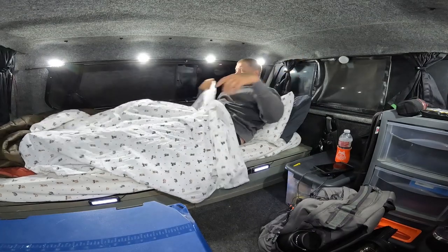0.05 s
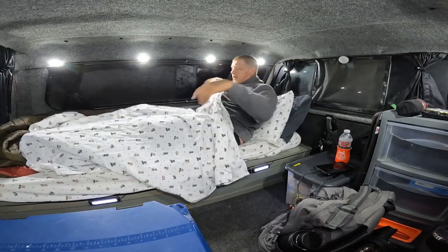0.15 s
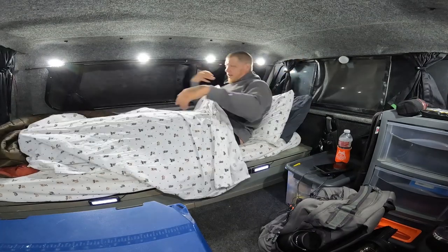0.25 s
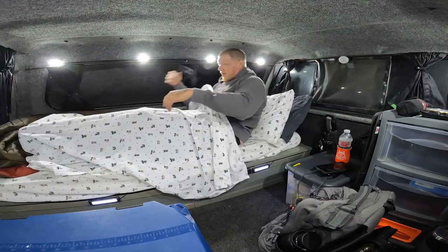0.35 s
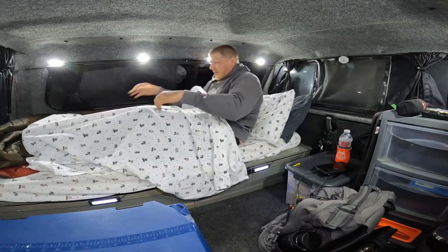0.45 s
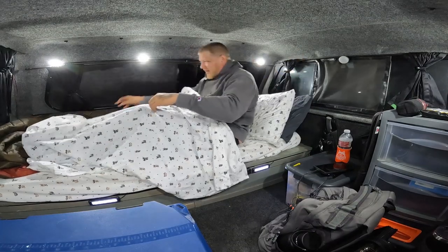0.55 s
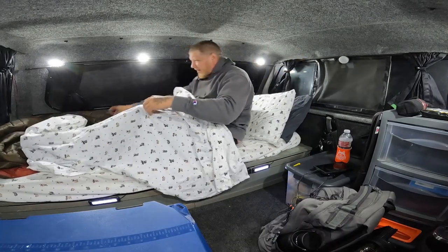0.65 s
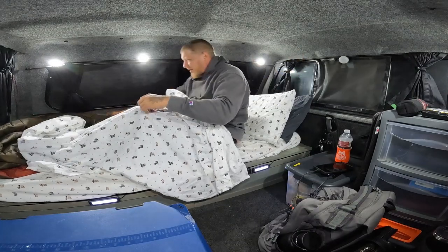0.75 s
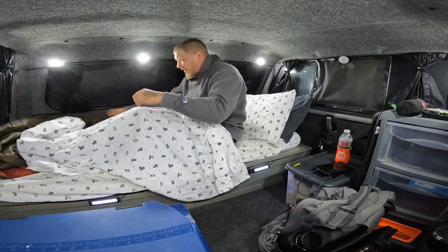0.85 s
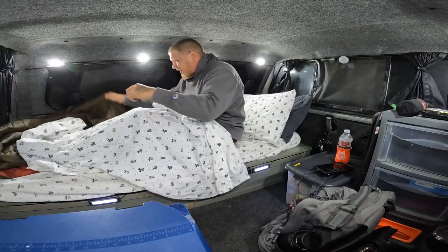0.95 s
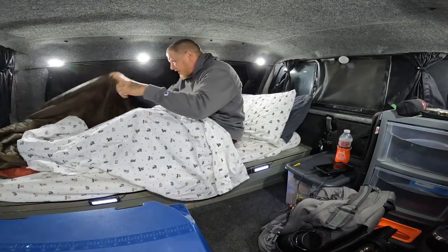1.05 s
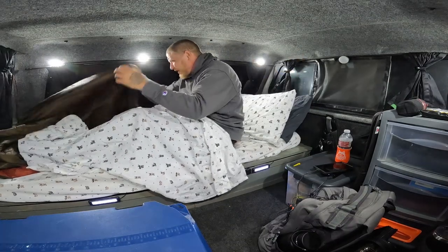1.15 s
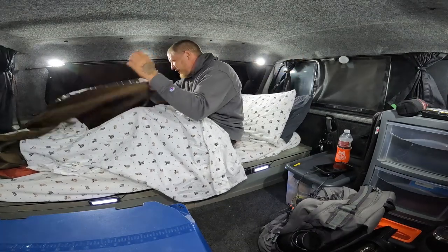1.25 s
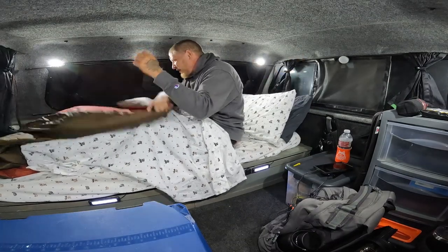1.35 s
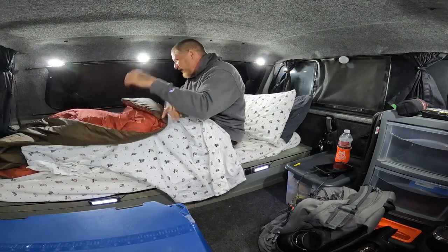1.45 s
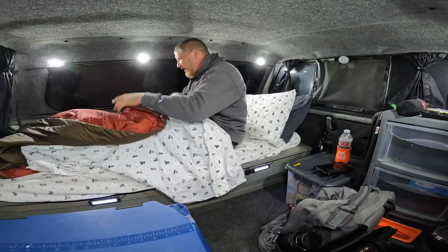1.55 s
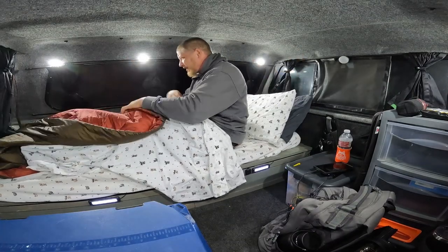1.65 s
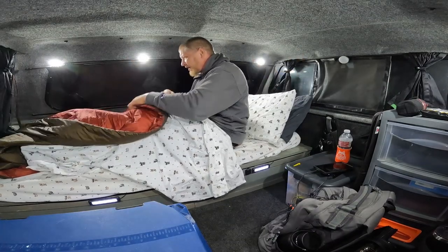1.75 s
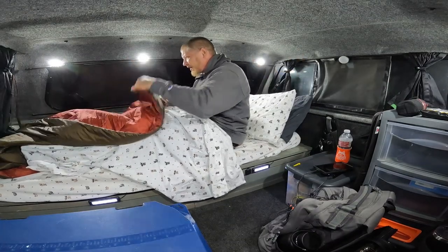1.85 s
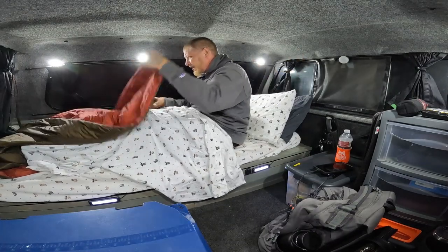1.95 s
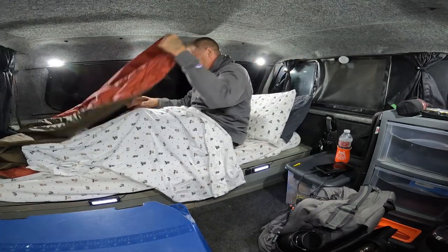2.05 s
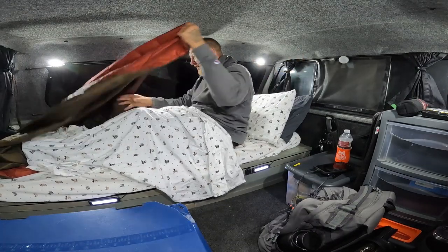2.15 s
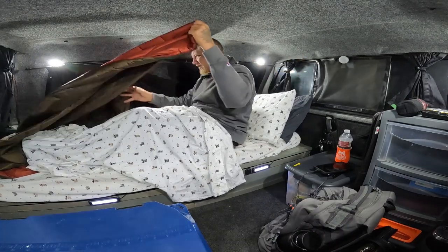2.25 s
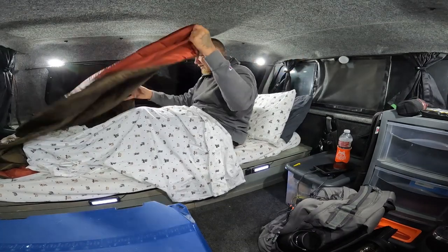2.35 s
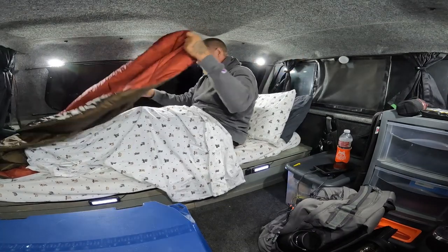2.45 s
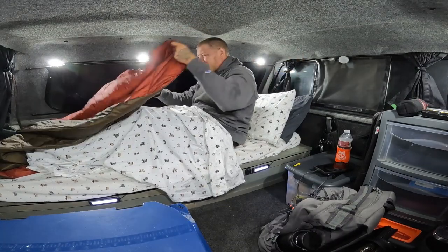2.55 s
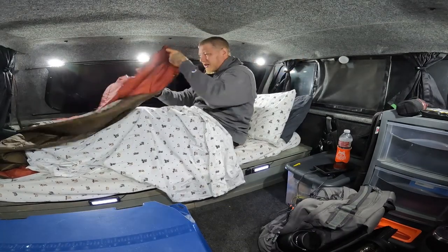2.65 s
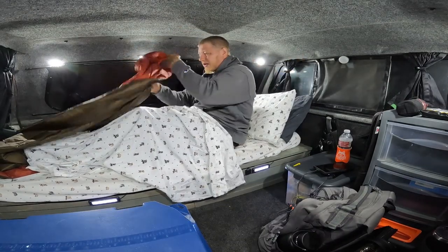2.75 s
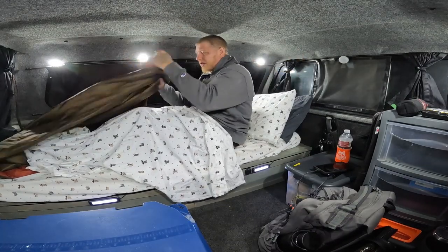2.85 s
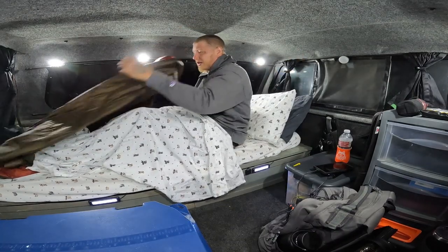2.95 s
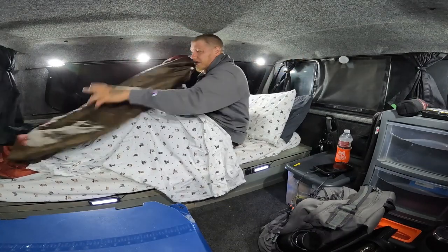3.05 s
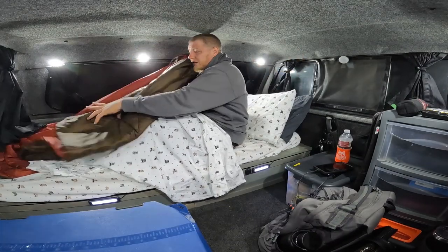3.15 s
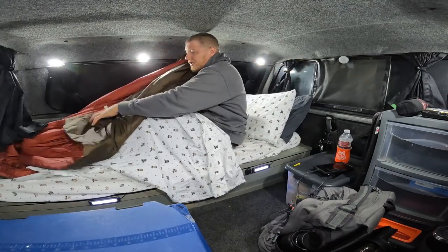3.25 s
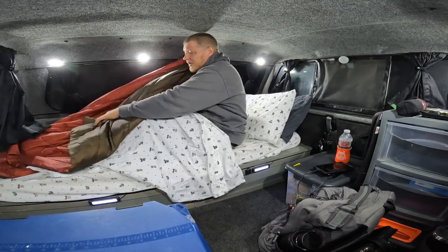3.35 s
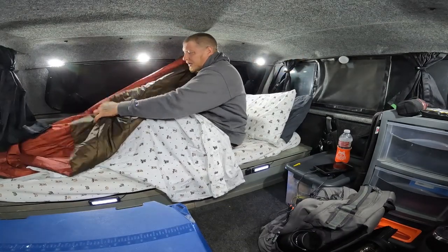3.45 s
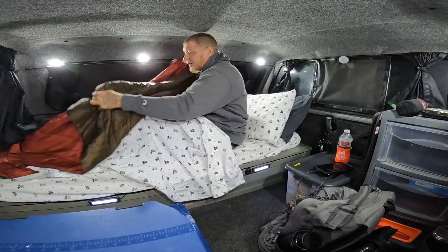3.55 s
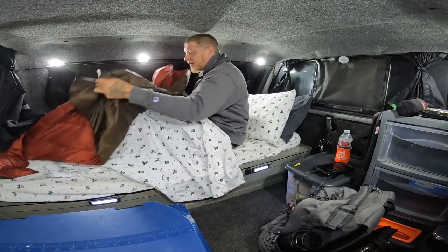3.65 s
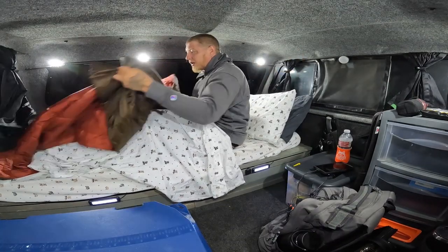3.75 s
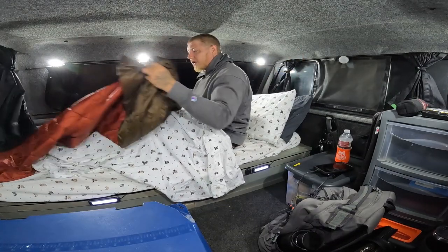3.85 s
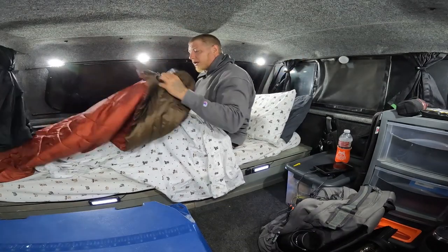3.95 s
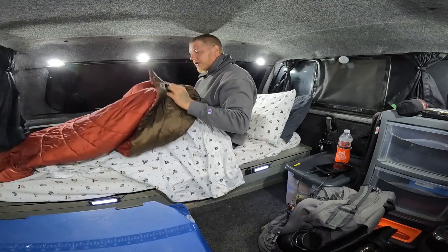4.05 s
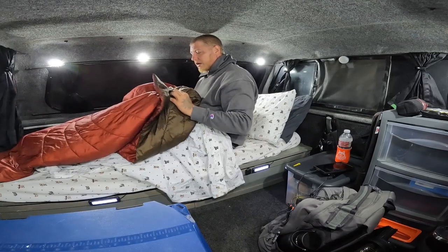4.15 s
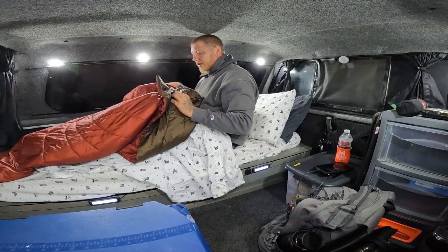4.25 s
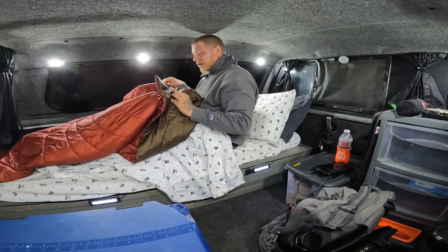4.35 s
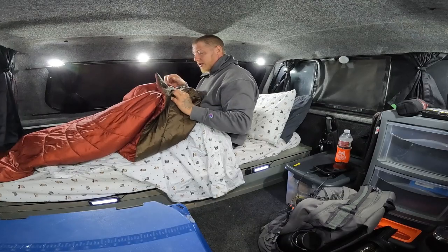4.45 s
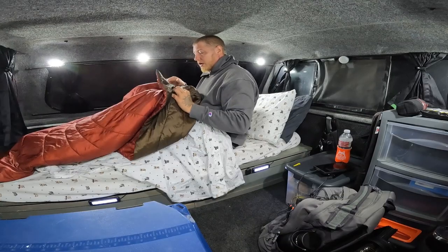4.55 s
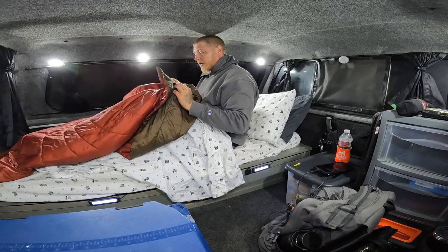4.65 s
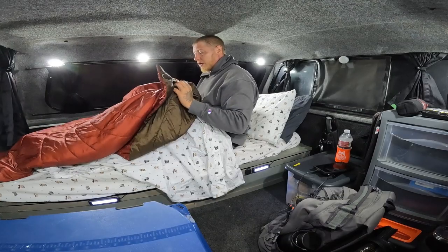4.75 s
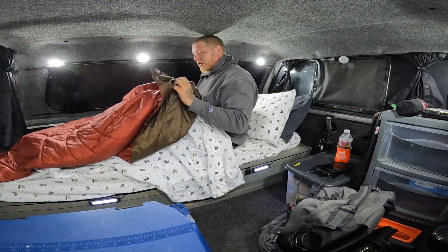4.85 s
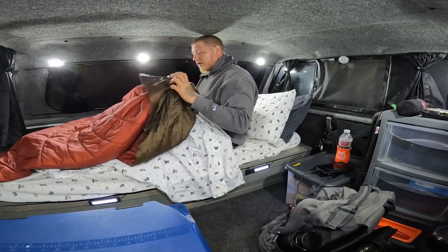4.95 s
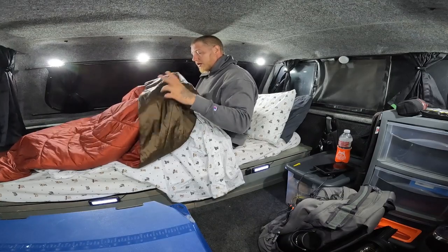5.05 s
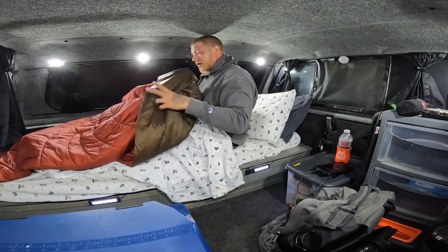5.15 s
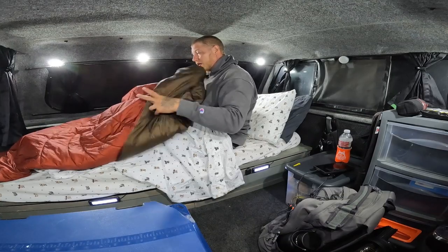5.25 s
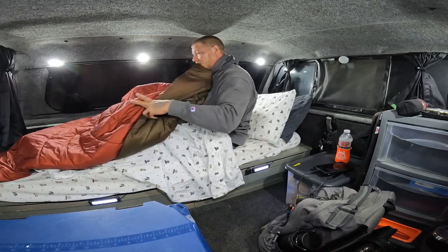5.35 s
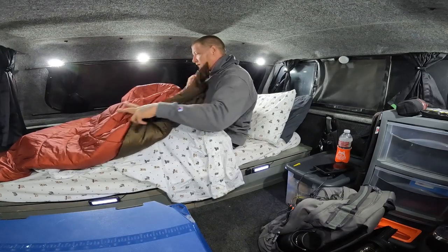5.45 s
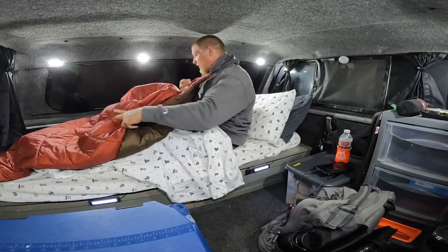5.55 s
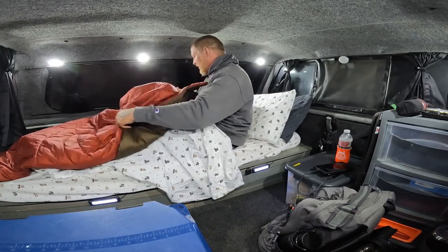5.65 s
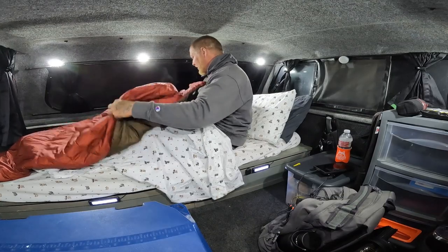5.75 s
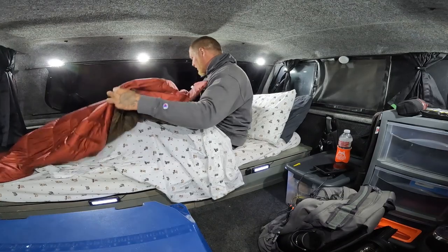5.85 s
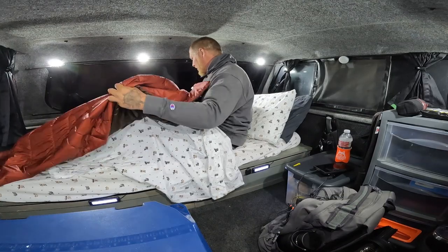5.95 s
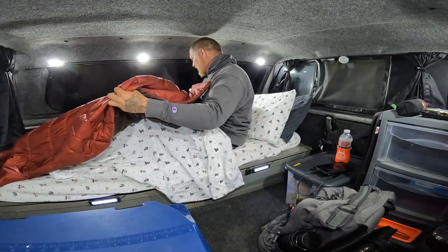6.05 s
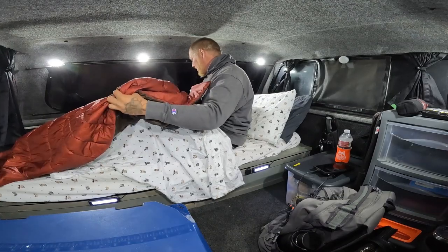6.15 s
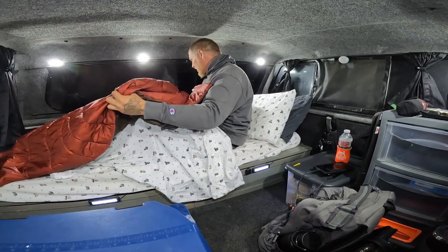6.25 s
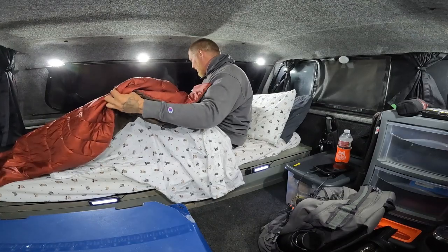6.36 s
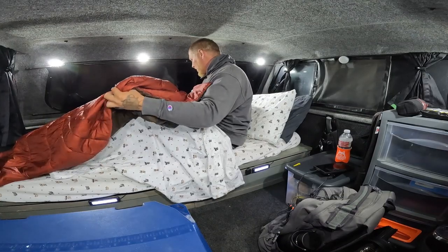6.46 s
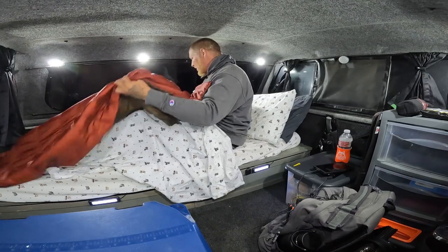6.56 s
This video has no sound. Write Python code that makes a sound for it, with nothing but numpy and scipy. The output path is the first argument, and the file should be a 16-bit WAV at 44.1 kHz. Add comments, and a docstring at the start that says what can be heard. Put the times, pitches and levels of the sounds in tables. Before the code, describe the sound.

Close, dry stereo pickup in a small padded camper. Covers flop softly and a few bed knocks thud, then a nylon sleeping bag is hauled up in quick swishes with snapping folds. The firmest woody knock comes early; broader, brighter shakes follow, then gentler sliding, a tiny hollow pop and more rustling.

```python
"""A small padded camper: someone sitting on a mattress pulls up a nylon sleeping bag and shakes it out.
The shell's swish and crinkle are coloured noise under bell-shaped sweeps, roughened by random creases.
Thick folds flop, bump and snap in short noise bursts; threads squeak and a puff of air pops as sines.
Each waft sets the cabin air swaying in deep noise, and bodies and knocks ring the bed's decaying tones."""
import sys
import numpy as np
from scipy import signal
from scipy.fft import rfft, irfft
from scipy.io import wavfile
from scipy.ndimage import uniform_filter1d

SR = 44100
rng = np.random.default_rng(int(sys.argv[2]) if len(sys.argv) > 2 else 0)


def master(y):
    """Save y as 16-bit WAV."""
    cut = np.clip(np.atleast_2d(y).T, -1, 1)
    pcm = np.round(cut * 32767)  # scale
    wavfile.write(sys.argv[1], SR, pcm.astype(np.int16))


N = 291060
TIME = np.arange(N) / SR   # seconds
FREQ = np.maximum(np.fft.rfftfreq(N, 1 / SR), 1)   # Hz, kept above zero so its logarithm exists


def from_db(db):
    """Turn decibels into a gain."""
    return 10 ** (np.asarray(db) / 20)


def rms_one(x):
    """Scale a signal to unit power."""
    return x / np.sqrt(np.mean(x ** 2) + 1e-20)


def over_freq(points):
    """Read a table at every frequency, with straight lines over log frequency."""
    hz, value = np.transpose(points)
    return np.interp(np.log(FREQ), np.log(hz), value)


def colour(points):
    """Gain of a noise spectrum, falling steeply beyond both ends of its table."""
    low_edge = np.minimum(FREQ / points[0][0], 1) ** 3
    high_edge = np.minimum(points[-1][0] / FREQ, 1) ** 3
    return from_db(over_freq(points)) * low_edge * high_edge


def drift(rate_hz):
    """Slow random wandering with a spread of 1."""
    spectrum = rfft(rng.standard_normal(N))
    return rms_one(irfft(spectrum / (1 + (FREQ / rate_hz) ** 2), N))


def hiss():
    """Two unrelated white noises."""
    return rng.standard_normal((2, N))


# how alike left and right are: pitch_hz, likeness (0 to 1)
EAR_LIKENESS = [(60, 0.99), (150, 0.99), (300, 0.95), (600, 0.72), (1200, 0.79), (2200, 0.63), (4000, 0.7),
                (8000, 0.78), (12000, 0.15)]
# how much louder left is than right: pitch_hz, left_minus_right_db
EAR_LEAN = [(60, 0), (200, 0.8), (380, 0.6), (700, 2.5), (1290, 1.5), (2380, 3.5), (4400, 1.5), (8120, 3.5),
            (15000, 8)]


def heard(pair, gain):
    """Colour two noises and mix them to left and right, most alike in the bass; their average has rms 1."""
    alike = np.clip(over_freq(EAR_LIKENESS), 0, .999)
    mid, side = rfft(pair) * gain
    sign = np.array([[1], [-1]])   # left, right
    mixed = np.sqrt(1 + alike) * mid + sign * np.sqrt(1 - alike) * side
    out = irfft(mixed * from_db(sign * over_freq(EAR_LEAN) / 2), N)
    return out / np.std(out.mean(axis=0))


def bursts(times, levels_db, rise_s, t60):
    """Loudness curve of blows that swell quickly, then die away by 60 dB in t60 seconds."""
    out = np.zeros(N)
    age = TIME[:SR // 2]
    shape = (1 - np.exp(-age / rise_s)) * from_db(-60 * age / t60)
    for s, db in zip(times, levels_db):
        part = out[round(s * SR):][:len(age)]   # a view: adding to it adds to out
        part += from_db(db) * shape[:len(part)] / shape.max()
    return out


def ring(clicks, hz, t60):
    """A two-pole resonance: a unit click sets a dying sine of height 1 ringing."""
    radius = from_db(-60 / (t60 * SR))
    angle = 2 * np.pi * hz / SR
    tiny = 1e-18   # keeps the filter away from extremely small numbers
    return signal.lfilter([0, np.sin(angle)], [1, -2 * radius * np.cos(angle), radius ** 2], clicks + tiny)


def struck(times, levels_db, modes):
    """Blows ring a set of tones; levels_db has a row per tone, varied by about a decibel each blow."""
    at = np.round(times * SR).astype(int)
    out = np.zeros(N)
    chance_db = rng.standard_normal((len(times), len(modes)))
    for k, (hz, db, t60) in enumerate(modes):
        clicks = np.zeros(N)
        clicks[at] = from_db(levels_db[k] + db + chance_db[:, k])
        out += (-1) ** (k // 2) * ring(clicks, hz, t60)   # the sign flips after every two tones
    return out


def softened(x, contact_s):
    """A padded contact spreads each blow in time."""
    soft = np.exp(-1 / (contact_s * SR))
    return signal.lfilter([1 - soft], [1, -soft], x)


def crinkle(per_s, spread_db, scatter_s, share):
    """Loudness curve of friction: steady sliding plus random buckling creases, smeared by near walls."""
    happens = rng.random(N) < per_s / SR
    sizes = from_db(spread_db * np.minimum(rng.exponential(1, N), 4)) * happens
    power = signal.lfilter([1], [1, -np.exp(-1 / (scatter_s * SR))], sizes ** 2 + 1e-18)
    share = np.clip(share, 0, 1)   # part of the power that comes from creases
    return np.sqrt(1 - share + share * power / power.mean())


MOVEMENT_DROP_DB = 9.5   # how much quieter one swell time before the peak and one fade time after it


def movement(s, swell_s, fade_s):
    """Cloth or air gathers speed and slows again in a bell that peaks at 1."""
    since = TIME - s
    away = np.minimum(np.abs(since) / np.where(since < 0, swell_s, fade_s), 4)
    return from_db(-MOVEMENT_DROP_DB * away ** 2)


# tone of the cabin at rest: pitch_hz, level_db (per Hz, relative)
QUIET_CABIN_TONE = [(12, -38), (20, 14.5), (129, -23), (185, -5), (361, -19), (477, -29), (533, -11.5),
                    (931, -56), (1370, -6), (2610, -56), (2830, -34), (3850, -32), (5370, -15.5),
                    (7300, -21), (15500, -53)]


def still_air():
    """The cabin at rest is a very quiet, steady coloured noise."""
    return from_db(-66.5) * heard(hiss(), colour(QUIET_CABIN_TONE))


# air pushed about as the bag billows and settles: peak_s, swell_and_fade_s, level_db
AIR_PUSHES = [(0.17, 0.44, -41.5), (0.9, 0.3, -42), (1.27, 0.099, -27.5), (1.52, 0.084, -39.5),
              (1.82, 0.075, -38.5), (2.22, 0.18, -37.5), (2.96, 0.4, -46.5), (3.4, 0.14, -40),
              (3.77, 0.094, -29.0), (3.93, 0.18, -38), (4.99, 0.38, -56), (5.41, 0.15, -46.5),
              (5.78, 0.12, -42), (6.08, 0.63, -54.0)]


def cabin_air(sway_hz, sharpness, flutter_db, flutter_growth, uneven_db):
    """The closed cabin answers each waft with a deep sway, alike at both ears, and with some flutter."""
    push_power = sum((from_db(db) * movement(s, length_s, length_s)) ** 2 for s, length_s, db in AIR_PUSHES)
    push = np.sqrt(push_power)
    response = 1 / (1 + 1j * sharpness * (FREQ / sway_hz - sway_hz / FREQ)) ** 2
    wave = signal.hilbert(irfft(rfft(rng.standard_normal(N)) * response, N))
    # even out the resonant noise, so that the push sets its strength
    recent_power = uniform_filter1d(np.abs(wave) ** 2, size=SR // 16)
    sway = rms_one(wave.real / np.sqrt(recent_power))
    flutter_tone = colour([(26, -7), (40, -7), (60, -18), (110, -28.0)])   # Hz, dB per Hz
    flutter = heard(hiss(), flutter_tone).mean(axis=0)
    # the flutter's share grows with the push
    flutter_gain = from_db(flutter_db) * (push / push.max()) ** flutter_growth
    unevenness = from_db(uneven_db * drift(8))
    return push * unevenness * (sway + flutter_gain * flutter)


# weight shifting on the mattress: start_s, heave_db, boom_db (drive of the tones)
WEIGHT_SHIFTS = [(0.021, -56.5, -37), (0.1, -41, -41), (0.149, -49, -31), (0.195, -53, -33.5),
                 (0.239, -54, -48), (0.399, -54, -43), (1.139, -52, -49), (1.552, -34.5, -35),
                 (1.632, -52, -37), (1.76, -35, -35.5), (2.201, -34, -51), (3.251, -43.5, -41),
                 (3.402, -35, -41.5), (3.668, -56, -43), (3.76, -56, -47), (3.86, -53, -42),
                 (5.712, -30, -42.5), (5.895, -45, -40)]
# mattress frame under load, the lowest is the heave, the others the boom: pitch_hz, level_db, t60_s
FRAME_TONES = [(44.3, 0.5, 0.53), (87.5, 1, 0.25), (110.7, -7, 0.42)]


def mattress(push_s):
    """A soft push of body weight sets the frame heaving and booming."""
    s, heave_db, boom_db = np.transpose(WEIGHT_SHIFTS)
    frame = struck(s, [heave_db, boom_db, boom_db], FRAME_TONES)
    return softened(softened(frame, push_s), push_s)


# knocks on the bed, before trims: start_s, deep_thud_db, upper_thud_db, clack_db, tick_db
BED_KNOCKS = [(0.396, -42, -43, -45, -57.5), (0.510, -49, -47, -57, -66), (0.733, -38.5, -42, -42.5, -52),
              (0.93, -60, -58.5, -69, -65), (1.252, -48, -52, -61, -63), (1.55, -31, -31, -29.5, -33.5),
              (1.965, -40.5, -44, -45.5, -53), (2.023, -56, -66, -50, -56), (3.409, -45.5, -57, -40.5, -46),
              (5.147, -60, -74, -59.5, -61), (5.324, -55.5, -79, -63.5, -57), (5.891, -36, -43, -41.5, -52),
              (6.164, -61, -55.5, -61, -67)]
# bed platform and cabin: pitch_hz, level_db (relative), t60_s
PLATFORM_TONES = [(157, -4, 0.29), (184.6, -2.5, 0.25), (208.3, -3.5, 0.22), (256.5, -1, 0.19),
                  (301.5, 1, 0.19), (354, -1, 0.042), (409.6, 3, 0.1), (450, -5.5, 0.14), (618, -8.5, 0.11)]
# the board that takes the blow: pitch_hz, level_db (relative), t60_s
BOARD_TONES = [(1180, -1, 0.08), (1224, 0, 0.024), (1370, -4, 0.041), (1927, -2.5, 0.033)]
# scattered clack of a knock: pitch_hz, level_db (per Hz, relative)
CLACK_TONE = [(300, 7.5), (600, 4.5), (900, -1.5), (1230, 4.5), (1550, -1), (1950, 2.5), (2500, -6.5),
              (4000, -13.5)]
# hard edge of knocks, also used by the snaps: pitch_hz, level_db (per Hz, relative)
HARD_EDGE_TONE = [(1500, -22), (2700, 4), (4500, 6.5), (7500, 1), (9000, -7), (12000, -15), (15500, -38)]
# dense low tones of the cabin: pitch_hz, level_db (per Hz, relative)
RUMBLE_TONE = [(70, 6), (120, 3), (170, -5), (260, -22.5), (340, 7.5), (450, 2), (650, -10), (900, -27)]


def knocks(contact_s, t60_clack, t60_tick):
    """A hard tick, a woody clack scattered by the walls, then the low tones of bed and cabin ring on."""
    s, deep_db, upper_db, clack_db, tick_db = np.transpose(BED_KNOCKS)
    # tones below 250 Hz follow the deep thud, those above 400 Hz the upper thud
    drive_db = []
    for hz, _, _ in PLATFORM_TONES:
        upper_part = np.interp(hz, [250, 400], [0, 1])
        drive_db.append(deep_db + upper_part * (upper_db - deep_db))
    thud = softened(struck(s + 0.00058, drive_db, PLATFORM_TONES), contact_s)
    board = struck(s + 0.00151, [clack_db] * len(BOARD_TONES), BOARD_TONES)
    clack = heard(hiss(), colour(CLACK_TONE)) * bursts(s, clack_db + .5, rise_s=0.0017, t60=t60_clack)
    tick = heard(hiss(), colour(HARD_EDGE_TONE)) * bursts(s - .001, tick_db + 4.0, rise_s=0.00087, t60=t60_tick)
    # the cabin's dense tones rumble on behind the blow
    rumble_db = (deep_db + upper_db) / 2 - 6.5
    rumble = heard(hiss(), colour(RUMBLE_TONE)) * bursts(s + .002, rumble_db, rise_s=.004, t60=.17)
    lean_left = from_db([[.4], [-.4]])
    return (from_db(5.0) * thud + from_db(-1) * board) * lean_left + clack + tick + rumble


# threads catching and slipping in step: start_s, length_s, pitch_hz (wavers), level_db (flutters)
THREAD_SQUEAKS = [(2.91, 0.32, 2244, -56), (2.982, 0.045, 2270, -51), (3.042, 0.028, 2210, -49),
                  (3.25, 0.032, 1790, -51), (5.703, 0.0086, 3130, -39), (6.182, 0.037, 1830, -49),
                  (6.216, 0.18, 1800, -62)]


def squeaks(waver):
    """The weave zips briefly: a swelling sine whose pitch wavers with the pull."""
    out = np.zeros(N)
    unsteady_time = np.cumsum(1 + waver * drift(114.0)) / SR
    for s, length_s, hz, db in THREAD_SQUEAKS:
        swell = np.sin(np.pi * np.clip((TIME - s) / length_s, 0, 1))
        out += from_db(db) * swell * np.sin(2 * np.pi * hz * unsteady_time)
    flutter = from_db(2.5 * drift(90))
    lean_left = from_db([[1.3], [-1.3]])
    return out * flutter * lean_left


# a pocket of air pops out of the quilting: start_s, level_db (envelope peak), pitch_hz
AIR_POPS = [(5.561, -38, 820), (5.574, -32.5, 765)]


def puffs():
    """Trapped air escapes with a hollow pop: a few cycles of a sine."""
    out = np.zeros(N)
    for s, db, hz in AIR_POPS:
        out += bursts([s], [db], rise_s=.002, t60=0.014) * np.sin(2 * np.pi * hz * (TIME - s))
    return out


# folds that snap taut, before trims: start_s, flap_db, crack_db
FOLD_SNAPS = [(0.715, -49.5, -74), (1.154, -48, -52), (1.162, -51, -48), (1.217, -38, -54),
              (1.378, -57, -42), (1.452, -46.5, -61), (1.691, -51, -50.5), (1.786, -45, -59),
              (1.810, -46, -62), (2.060, -40, -55), (2.069, -35.5, -50), (2.083, -39, -63),
              (2.193, -43, -59), (2.811, -39.5, -56), (2.98, -45, -49), (3.257, -52, -44),
              (3.301, -51, -46), (3.724, -40.5, -46), (3.904, -42.5, -60), (4.032, -43, -58),
              (5.289, -50.5, -57), (5.705, -37.5, -50), (5.73, -48, -44), (5.81, -46, -45.5),
              (5.938, -40.5, -56)]
# papery flap of a fold: pitch_hz, level_db (per Hz, relative)
FLAP_TONE = [(350, 2), (700, -5), (1000, -1), (1300, 2), (2000, 0), (2600, -10), (4000, -15.5)]


def snaps():
    """A fold pulled taut gives a short papery flap with a hard, bright edge."""
    s, flap_db, crack_db = np.transpose(FOLD_SNAPS)
    flap = heard(hiss(), colour(FLAP_TONE)) * bursts(s, flap_db - 0.5, rise_s=0.00078, t60=0.05)
    crack = heard(hiss(), colour(HARD_EDGE_TONE)) * bursts(s, crack_db + 2.5, rise_s=0.0006, t60=0.04)
    return flap + crack


# soft dull bumps of a limb under the covers: start_s, level_db
LIMB_BUMPS = [(0.509, -45), (0.998, -48.5), (2.024, -41), (2.067, -41), (2.086, -44), (2.142, -44),
              (2.189, -41), (2.269, -46), (3.167, -45), (3.669, -54)]
# thick bedding: pitch_hz, level_db (per Hz, relative)
BEDDING_TONE = [(65, 2), (88, -2), (120, -4), (165, 3), (230, 0.5), (300, 0), (400, -6), (480, -15.5),
                (600, -33.5)]
# scuffing hand: pitch_hz, level_db (per Hz, relative)
SCUFF_TONE = [(430, 1), (500, 3.5), (600, 3), (750, 1), (880, 1.5), (1020, 1.5), (1150, -15)]


def folds(flop_gain, scuff_gain):
    """Padded cloth flops in dull, uneven lumps, bumps over moving limbs and scuffs where it is pressed."""
    lumps = from_db(-0.5) * flop_gain * crinkle(per_s=120, spread_db=3.0, scatter_s=0.0053, share=0.26)
    bumps = bursts(*np.transpose(LIMB_BUMPS), rise_s=.003, t60=0.11)
    flop = heard(hiss(), colour(BEDDING_TONE)) * np.hypot(lumps, bumps)   # the two add in power
    grain = crinkle(per_s=92, spread_db=3.5, scatter_s=0.0059, share=0.33)
    scuff = heard(hiss(), colour(SCUFF_TONE)) * grain
    return flop + from_db(-0.22) * scuff_gain * scuff


def near_walls(first_s, last_s, echo_db, count=40):
    """Early echoes off roof and windows leave a fixed fine ripple on the rustle's spectrum."""
    lags = rng.uniform(first_s, last_s, count)
    echoes = np.zeros(N)
    echoes[np.round(lags * SR).astype(int)] = from_db(echo_db) * rng.choice([-1, 1], count) / np.sqrt(count)
    return np.abs(1 + rfft(echoes))


# each pull or shake of the bag, before trims: peak_s, swell_s, fade_s, swish_db,
# then relative to the swish: sheen_db, rasp_db, flop_db (folds), scuff_db (hand)
BAG_SWEEPS = [(0.049, 0.11, 0.18, -50, -14.5, -0.5, 2.5, -6.5),
              (0.158, 0.094, 0.222, -51.5, -14.5, -0.5, 3.5, -4.5),
              (0.434, 0.22, 0.18, -61.5, -9, 1.5, 14.5, 1), (0.577, 0.081, 0.255, -61.5, -9, 1, 8, -3),
              (0.836, 0.07, 0.144, -52.5, -11.5, -5, -5, -14.5),
              (0.948, 0.11, 0.2, -52.0, -11.5, -1.5, 0.5, -17),
              (1.147, 0.063, 0.12, -49.5, -12.0, -0.5, 1.5, -5.5),
              (1.262, 0.091, 0.096, -47.5, -11, -3, -1, -9.5),
              (1.367, 0.024, 0.029, -49.5, -2.5, -1.5, -11, -27),
              (1.454, 0.11, 0.16, -49.0, -12.5, -3, -4.5, -11.5),
              (1.625, 0.074, 0.053, -54.5, -12, -7, 8, -11.0), (1.693, 0.0086, 0.049, -52, -9, -3.5, 9, -5),
              (1.794, 0.08, 0.13, -46.5, -9, -3, -1, -6), (2.009, 0.054, 0.34, -51, -13.5, 0.0, 1, -9),
              (2.271, 0.089, 0.089, -49, -6.5, -4, -3, -6.5),
              (2.459, 0.221, 0.2, -56.0, -13.5, -2.5, -10.5, -14.5),
              (2.7, 0.16, 0.17, -49.5, -13.5, -4, -8, -14.5),
              (2.82, 0.083, 0.12, -45, -12.5, -1, -6.0, -9.5),
              (2.988, 0.054, 0.104, -48.5, -9, -3, -6, -8.5),
              (3.115, 0.08, 0.19, -47.0, -12.5, -2.5, -1, -6.5),
              (3.264, 0.041, 0.19, -45, -10.5, -5.0, -6, -8.5),
              (3.395, 0.068, 0.16, -46.0, -11, -4.0, -11, -12.5),
              (3.73, 0.15, 0.16, -43.0, -14, -6, -3.5, -10.0),
              (3.953, 0.2, 0.32, -49.5, -12.5, -3, -4.5, -10),
              (4.266, 0.26, 0.14, -56, -14, -3.5, -12, -23),
              (4.776, 0.17, 0.25, -52.0, -11.5, -6, -13.5, -17),
              (4.995, 0.1, 0.14, -55, -11.0, -4.5, -19, -25), (5.16, 0.061, 0.1, -52, -13, -4.5, -9, -23.5),
              (5.45, 0.2, 0.27, -47, -6.0, -9, -13.5, -21), (5.733, 0.35, 0.15, -45.5, -12.5, -3.5, -7, -8),
              (5.977, 0.13, 0.17, -48.5, -14.5, -2.5, -1.5, -12.5),
              (6.202, 0.082, 0.069, -51, -11.5, -3.5, -7.5, -18),
              (6.33, 0.085, 0.24, -57.0, -16, -3.5, -7.5, -16),
              (6.609, 0.09, 0.08, -49.5, -11.5, -6.0, -14.5, -16.5)]
SHEEN_POWER = 1.26   # the sheen grows faster with speed than the swish, so it keeps to the middle of a sweep


def sweeping():
    """Gains of swish, sheen, rasp, flop and scuff as the bag moves; overlapping sweeps add in power."""
    speeds = np.array([movement(s, swell_s, fade_s) for s, swell_s, fade_s, *_ in BAG_SWEEPS])
    swish, *others = from_db(np.transpose(BAG_SWEEPS)[3:])
    sheen, rasp, flop, scuff = swish * others
    laws = [(swish, 1), (sheen, SHEEN_POWER), (rasp, 1), (flop, 1), (scuff, 1)]
    return [np.sqrt(gain ** 2 @ speeds ** (2 * power)) for gain, power in laws]


# nylon shell: pitch_hz, level_db (per Hz, relative)
SHELL_TONE = [(950, -17.5), (1080, -3.5), (1230, 0), (1490, -0.5), (2100, -1), (2600, -2.5), (3000, -1),
              (4000, -1), (6000, -3.5), (7600, -8.5), (8300, -16), (10000, -34)]
# sheen of the shell's fast strokes: pitch_hz, level_db (per Hz, relative)
SHEEN_TONE = [(4500, -1.5), (5900, 1.5), (7600, 4), (8200, -0.5), (9300, -1), (10200, -6.5), (11000, -6.5),
              (11900, -2.5), (13000, -13.5), (14200, -17.5), (15500, -38)]


def nylon(swish_gain, sheen_gain, rasp_gain):
    """Threads rub and creases buckle; pressure brings out the low rasp, speed the high sheen."""
    grain = crinkle(per_s=790, spread_db=1.0, scatter_s=0.0015, share=0.15) * from_db(0.68 * drift(21))
    rasp_grain = crinkle(per_s=88, spread_db=0.5, scatter_s=0.003, share=0.18)
    below = 1 / (1 + (FREQ / 2500) ** 8)   # splits the shell's power: rasp below 2500 Hz, swish above
    walls = near_walls(first_s=.002, last_s=.02, echo_db=-15.5)
    rasp = heard(hiss(), colour(SHELL_TONE) * walls * np.sqrt(below)) * rasp_grain
    swish = heard(hiss(), colour(SHELL_TONE) * walls * np.sqrt(1 - below))
    sheen = heard(hiss(), colour(SHEEN_TONE) * walls)
    rustle = from_db(-2.5) * swish_gain * swish
    rustle += from_db(-1.1) * rasp_gain * rasp
    rustle += from_db(5.0) * sheen_gain * sheen
    return grain * rustle


def scene():
    """Bedding, bed and swaying cabin air over a very quiet floor."""
    swish, sheen, rasp, flop, scuff = sweeping()
    air = still_air() + cabin_air(sway_hz=18.4, sharpness=2.8, flutter_db=-10, flutter_growth=0.21, uneven_db=1.5)
    bed = mattress(push_s=0.00079) + knocks(contact_s=0.00025, t60_clack=0.063, t60_tick=0.033)
    bedding = squeaks(waver=0.0092) + puffs() + snaps() + folds(flop, scuff) + nylon(swish, sheen, rasp)
    return air + bed + bedding


CUTOFF_HZ = 15600


def record(dry):
    """A steep low-pass filter cuts the top of the treble."""
    low_pass = signal.ellip(12, .1, 80, CUTOFF_HZ, fs=SR, output="sos")   # 0.1 dB ripple, 80 dB cut
    return signal.sosfilt(low_pass, dry)


dry = scene()
out = record(dry)
master(out)
```